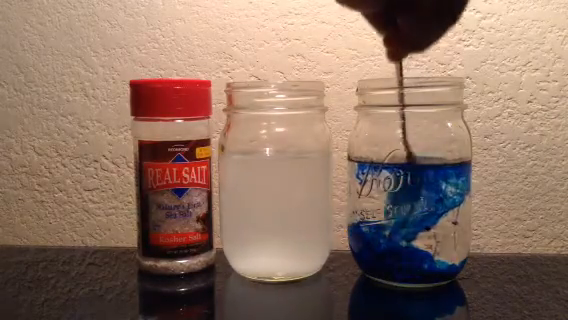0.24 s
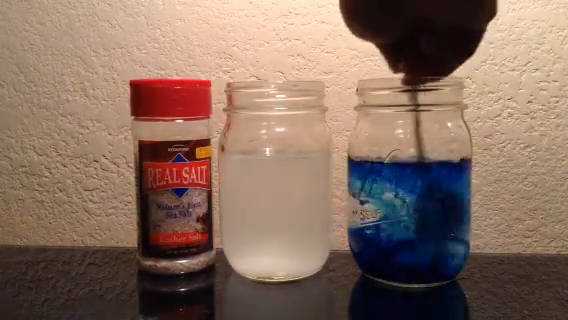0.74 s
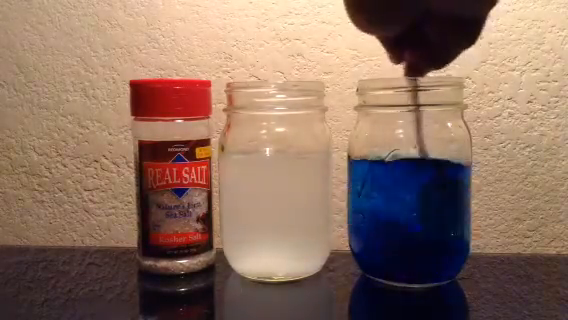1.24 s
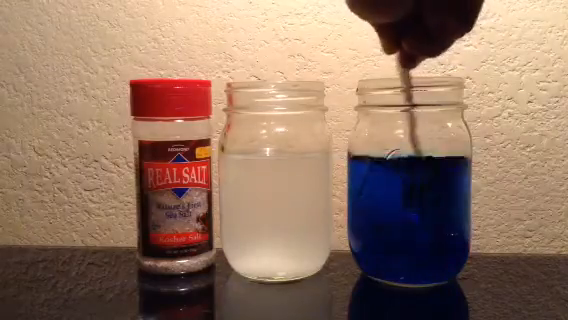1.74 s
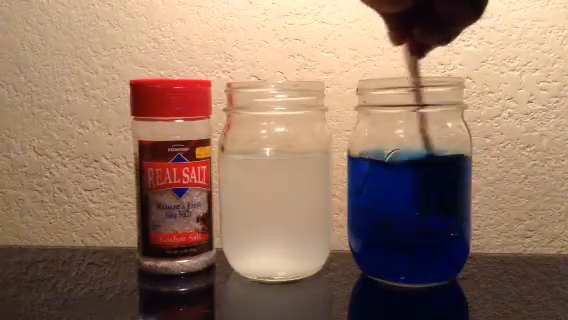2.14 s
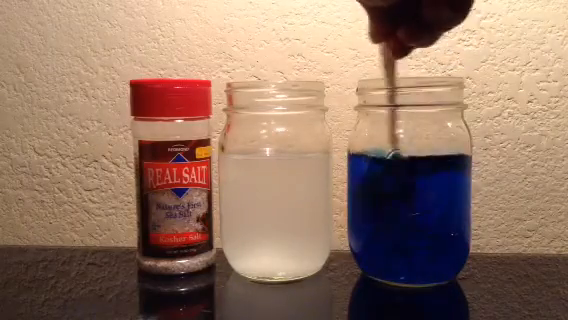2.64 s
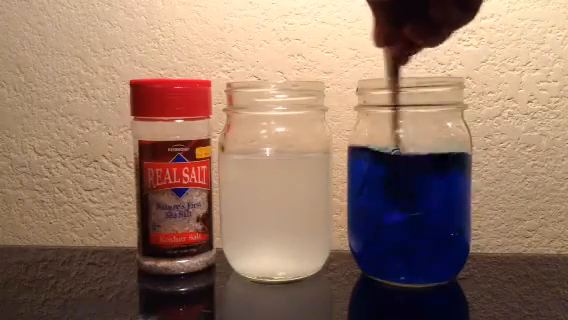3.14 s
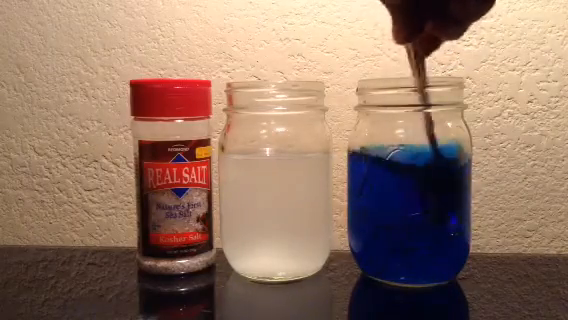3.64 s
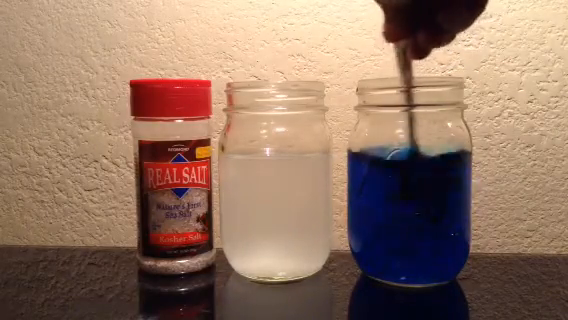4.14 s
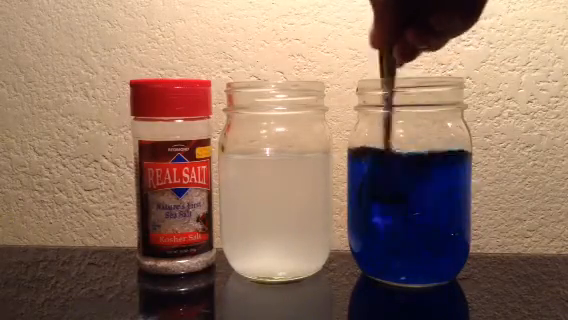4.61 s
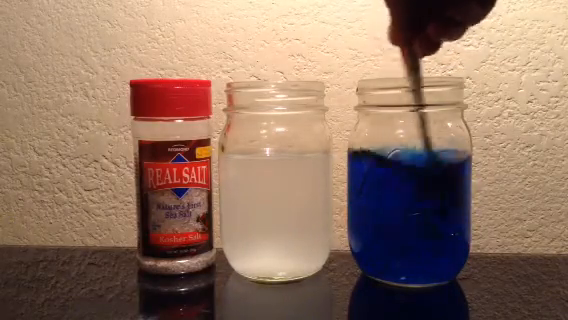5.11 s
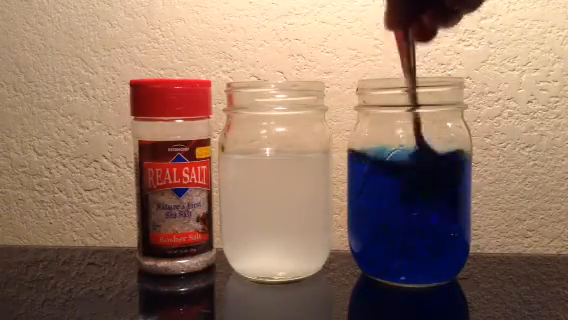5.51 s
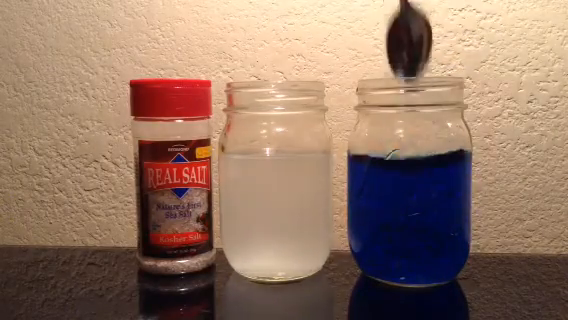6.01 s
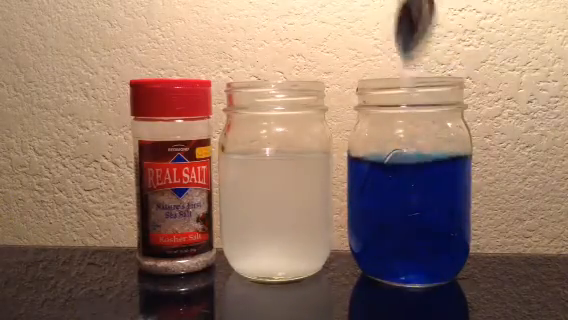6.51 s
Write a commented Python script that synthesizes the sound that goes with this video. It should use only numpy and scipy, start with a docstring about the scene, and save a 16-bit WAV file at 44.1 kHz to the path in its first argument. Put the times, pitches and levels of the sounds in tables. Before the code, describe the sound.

A quiet small room with faint microphone hiss and a low wavering murmur, heard about an arm's length from a glass jar of water. Soft slaps of water come at 0.2 and 0.5 s. A bright spoon clink rings at 0.8 s, a watery splash follows at 0.9, and a softer, rounder clink at 1.3. Around 1.7 to 1.9 s the water sloshes more clearly, with short rising bubble blips and a tiny tick; another dull slosh comes at 2.5. Light touches at 3.0 lead to a clear, singing clink at 3.3. After a slosh near 4.07, the hardest, sharpest hit lands at 4.15, its ring unsteady as the spoon leans on the glass. A final bright clink at 4.44 decays within half a second. Faint slaps at 4.8 and 5.2, weak bubbles at 5.6 and 6.4, and a barely audible low hum from 6 s finish it.

```python
"""A steel spoon stirs water in a glass jar on a table, an arm's length away in a quiet room.
From the start there is microphone hiss and a low, wavering room murmur, both shaped noise; soon water slaps
softly, as resonant noise broken into drops. Then clinks ring the jar's decaying modes, and the sloshing water
makes the wall's ring waver in pitch and level. Bubbles sound among the slaps as short rising tones.
Near the end a faint hum, one low sine, sets in."""
import sys
import numpy as np
from scipy import signal
from scipy.fft import rfft, irfft
from scipy.io import wavfile
from scipy.ndimage import uniform_filter1d

SR = 44100
rng = np.random.default_rng(int(sys.argv[2]) if len(sys.argv) > 2 else 0)


def wrap_up_sound(samples):
    """Save the sound to the file named by the first command line argument, as 16-bit audio."""
    columns = np.atleast_2d(samples).T
    # keep every value between -1 and 1, then stretch to whole-number steps
    tamed = np.clip(columns, -1, 1)
    steps = np.round(tamed * 32767).astype(np.int16)
    wavfile.write(sys.argv[1], SR, steps)


N = 298116


def undb(db):
    """Level law: 20 dB is a factor of ten in amplitude."""
    return 10 ** (np.asarray(db) / 20)


def fade(t, t60, rise):
    """Exponential decay: 60 dB down in t60 s, after a quick rise with time constant rise s."""
    return (1 - np.exp(-t / rise)) * np.exp(-np.log(1000) * t / t60)


def band(x, hz, width):
    """Simple resonance: two poles, gain 1 at the centre."""
    return signal.lfilter(*signal.iirpeak(hz, hz / width, fs=SR), x)


def hiss(size, resonances):
    """Filtered noise of rms 1: each (f/Hz, width/Hz, level/dB) resonance is passed twice for steep sides."""
    x = 0
    for hz, width, db in resonances:
        noise = band(band(rng.standard_normal(size), hz, width), hz, width)
        x = x + undb(db) * noise / np.sqrt(width)
    return x / np.std(x)


def add(out, s, x):
    """Superposition: mix x in from time s."""
    i = int(s * SR)
    out[i:i + len(x)] += x[:len(out) - i]


def wander(size, hold, smooth):
    """Slow random process: values held for hold samples, then a running mean over smooth samples."""
    steps = np.repeat(rng.standard_normal(size // hold + 1), hold)[:size]
    return uniform_filter1d(steps, size=smooth)


# relative spectrum of the background: (f/Hz, spectral level/dB)
BACKGROUND_SPECTRUM = [(15, -69), (25, -36.5), (64, -14), (97, -12), (212, -1), (427, -5.5), (463, -4),
                       (545, -8), (591, -4), (641, -8.5), (1070, -9.5), (1400, -13), (15250, -15.5),
                       (15700, -39)]
BACKGROUND_DB = -69  # rms


def quiet():
    """Stationary noise with a shaped spectrum; its part below about 500 Hz wavers in level as a murmur."""
    hz, db = np.transpose(BACKGROUND_SPECTRUM)
    f = np.maximum(np.arange(N // 2 + 1) * SR / N, 1)
    gain = undb(np.interp(np.log(f), np.log(hz), db))
    x = irfft(rfft(rng.standard_normal(N)) * gain, N)
    swell_db = 1.1 * wander(N, 8000, 8000)
    murmur = signal.sosfilt(signal.butter(2, 500, fs=SR, output="sos"), x)
    x = x + murmur * (undb(swell_db) - 1)
    return x * undb(BACKGROUND_DB) / np.std(x)


# water slaps: (t/s, body level/dB, body f/Hz, splash level/dB, t60/s)
SLAPS = [(0.155, -60, 262, -62, 0.2), (0.488, -65, 223, -83, 0.17), (0.935, -61, 1000, -61, 0.24),
         (1.702, -52.5, 410, -58.5, 0.18), (2.491, -54.5, 292, -63, 0.22), (3.368, -59.5, 604, -59, 0.11),
         (4.067, -52, 404, -59, 0.23), (4.761, -72.5, 205, -67, 0.15), (4.85, -69, 222.3, -82.5, 0.16),
         (5.219, -69.5, 339, -86, 0.15), (6.364, -71, 218, -86.5, 0.15)]
# resonances of the dull body and of the thin splash: (f/Hz, width/Hz, level/dB)
BODY_RESONANCES = [(410, 180, -1.5), (810, 300, -4), (1300, 600, -6.5)]
SPLASH_RESONANCES = [(3232, 330, -5), (3726, 1000, 2), (5000, 3000, -2.5), (10000, 8000, -3.5)]


def water():
    """Amplitude-modulated noise: slaps on the wall, a dull body and a thin splash, broken into small drops."""
    t, out = np.arange(SR // 3) / SR, np.zeros(N)
    for s0, body_db, body_hz, splash_db, t60 in SLAPS:
        drops = undb(2.5 * wander(len(t), 200, 100))
        body = undb(body_db) * hiss(len(t), [(body_hz, .25 * body_hz, 0)] + BODY_RESONANCES)
        splash = undb(splash_db) * hiss(len(t), SPLASH_RESONANCES)
        add(out, s0, drops * (body + splash) * fade(t, t60, .001))
    return out


def ring(hz, t, t60, phase=0):
    """Damped oscillation: one struck mode, whose pitch may move."""
    return fade(t, t60, 0.00067) * np.sin(2 * np.pi * np.cumsum(hz + 0 * t) / SR + phase)


def wet(hz, t, t60, pace, turn):
    """Varying mass loading by moving water: a mode's pitch drifts and its level flutters, at separate paces."""
    drift = 1 + 0.0023 * np.sin(2 * np.pi * ((4 + 8 * pace) * t + turn))
    flutter_db = 4.3 * np.sin(2 * np.pi * ((15 + 30 * turn) * t + pace))
    return undb(flutter_db) * ring(hz * drift, t, t60)


# at the hardest blow the spoon leans on the wall: (t/s, change of lower oval level/dB, of upper oval level/dB)
LEANING = [(4.142, 10.5, 6), (4.172, -16, -14.5), (4.192, 4, -10.5), (4.225, -8.5, 9), (4.259, -14, 7.5),
           (4.328, -12, 3), (4.345, -24, -24), (4.43, -21.5, -9)]
SLOSH_PER_S = 5.9  # the wave round the jar moves the ovals' pitch
SWAY_DB, SWAY_LAG = 1.5, 0.11  # level traded between the ovals, and turns by which this follows the pitch


def ovals(s0, oval_hz, gap_hz, depth_hz, slosh, low_db, low_t60, up_db, up_t60):
    """Split mode pair: two oval wall modes whose pitch and level vary with the wave round the jar."""
    t = np.arange(SR * 2 // 3) / SR
    low_hz = oval_hz + depth_hz * np.cos(2 * np.pi * (SLOSH_PER_S * t - slosh))
    sway_db = SWAY_DB * np.cos(2 * np.pi * (SLOSH_PER_S * t - slosh - SWAY_LAG))
    lean_s, lean_low_db, lean_up_db = np.transpose(LEANING)
    if lean_s[0] - .01 < s0 < lean_s[-1]:
        low_db = low_db + uniform_filter1d(np.interp(s0 + t, lean_s, lean_low_db), size=300)
        up_db = up_db + uniform_filter1d(np.interp(s0 + t, lean_s, lean_up_db), size=300)
    lower = undb(low_db + sway_db) * ring(low_hz, t, low_t60)
    upper = undb(up_db - sway_db) * ring(low_hz + gap_hz, t, up_t60)
    return lower + upper


def bowl(t, hz, hz2, lasting, draw):
    """Modal pair: the spoon's bowl rings in two close modes, the second weaker and longer."""
    first = wet(hz, t, .12 * lasting, *draw[0, -1, :2])
    second = wet(hz2, t, 0.19 * lasting, *draw[1, -1, :2])
    return first + 0.57 * second


def crack(t):
    """Impact noise: a very short broadband burst."""
    return hiss(len(t), [(4010, 11000, 0)]) * fade(t, 0.014, 0.00024)


# modes too dense to part, one list under the treble and one under the top: (f/Hz, width/Hz, level/dB)
SIZZLE = [
    [(7450, 610, 0.5), (8800, 1000, 1)],
    [(10800, 870, -2.5), (13000, 1400, -0.5), (14900, 600, -2)],
]
SIZZLE_DB, SIZZLE_T60_S = -4.5, .14  # level relative to its group; decay at ring time factor 1


def sizzle(t, treble_db, top_db, lasting):
    """High modal density: modes that overlap blur into decaying noise."""
    x = 0
    for db, blur in zip((treble_db, top_db), SIZZLE):
        decay = fade(t, SIZZLE_T60_S * lasting ** .5, .0007)
        x = x + undb(db + SIZZLE_DB) * hiss(len(t), blur) * decay
    return x


# modes of table, jar air, jar wall and spoon, in families that answer together: (f/Hz, ...)
FAMILY_HZ = [(195, 245, 300, 385), (720, 790), (940, 1030), (1250, 1370, 1580), (2235, 2895, 2975),
             (3860, 4092, 4185, 4430), (5225, 5280), (6720, 6820, 7090, 7355, 7592, 7790, 7950),
             (8430, 8540, 8655, 8870, 9222, 9530), (9880, 10180, 10590, 10935),
             (11680, 12070, 12650, 12920, 13270, 13880, 14320, 14800, 15050)]
# per family: (main mode t60/s, other modes t60/s, others' level/dB,
#              crowd of weak modes: one end f/Hz, other end f/Hz, level/dB, t60/s)
# the ring time factor scales every t60 but the main mode's; chance lowers the levels
FAMILY_SHAPE = [(0.097, 0.2, -3.5, 180, 510, -10.5, 0.15), (0.057, 0.029, 4, 550, 950, -9.5, .1),
                (.13, 0.22, -13, 820, 850, -19, 0.15), (.07, 0.063, -4.5, 1150, 2200, -10, .07),
                (.09, 0.14, -7, 2900, 2700, -11.5, .07), (0.11, .12, 1, 3700, 4900, -10, .1),
                (.19, 0.24, -8.5, 4950, 5400, -16, 0.19), (0.08, .13, -5.5, 7400, 8000, -14.5, .1),
                (.11, .13, -4.5, 9000, 7600, -15, 0.11), (.13, 0.33, -11.5, 9800, 11500, -16.5, .1),
                (.08, .12, -6.5, 23000, 20000, -12.5, .1)]
# clink group driving each family: 0 thud, 1 belly, 2 rim, 3 treble, 4 jar air, 5 top, 6 table, 7 shoulder
DRIVEN_BY = [6, 0, 4, 0, 1, 7, 2, 3, 3, 5, 5]
# main mode of each family: f/Hz (None: set by the clink)
MAIN_HZ = [245, 720, 1030, 1370, 2895, 4185, 5225, 7355, None, 10935, 13270]
# each family within its group: level/dB
FAMILY_DB = [-1.83, 2, 1.8, -0.9, -0.06, -2, 0.26, 0.2, -1, -3, -2.5]
# modes whose pitch the water loads: f/Hz
LOADED_HZ = (4185, 5225)
REST_HZ = 2490  # lower oval pitch at which the loaded modes keep their listed pitch


def families(t, group_db, neck_hz, oval_hz, lasting, draw):
    """Modal superposition: every blow starts all modes; loaded ones scale with this clink's lower oval."""
    x = np.zeros(len(t))
    for modes, shape, main_hz, group, own_db, luck in zip(
            FAMILY_HZ, FAMILY_SHAPE, MAIN_HZ, DRIVEN_BY, FAMILY_DB, draw):
        main_t60, other_t60, other_db, end_hz, end2_hz, crowd_db, crowd_t60 = shape
        db = group_db[group] + own_db
        main_hz = main_hz or min(modes, key=lambda hz: abs(hz - neck_hz))
        for hz, (pace, size, turn, *_) in zip(modes, luck):
            if hz == main_hz:
                mode_db, t60 = -3 * size, main_t60
            else:
                mode_db, t60 = other_db - 8 * size, other_t60 * lasting
            load = oval_hz / REST_HZ if hz in LOADED_HZ else 1
            x += undb(db + mode_db) * wet(hz * load, t, t60, pace, turn)
        for *_, place, size, turn in luck:
            hz = end_hz + (end2_hz - end_hz) * place
            weak = ring(hz, t[:SR // 6], crowd_t60 * lasting, 2 * np.pi * turn)
            add(x, 0, undb(db + crowd_db - 5 * size) * weak)
    return x


# clinks: (t/s, crack level/dB, ring time factor, spoon bowl pair f/Hz, f/Hz, bowl level/dB,
#          thud, belly, rim, treble level/dB, lower oval f/Hz, gap to upper oval f/Hz,
#          slosh depth f/Hz, slosh phase/turns, lower oval level/dB, t60/s, upper oval level/dB, t60/s,
#          jar air, top, table, shoulder level/dB, main neck mode f/Hz)
CLINKS = [(0.7982, -27, 0.79, 3653, 3740, -24, -30, -50, -33, -34.5, 2516, 157.8, 5, 0.02, -30.5, .3, -24.5, 0.37, -51, -36.5, -37, -46, 8655),
          (1.3202, -61, 0.58, 3630, 3680, -31.5, -40.5, -32.5, -27, -40, 2507, 165, 6, 0.02, -36.5, .44, -26.5, 0.37, -44.5, -30.5, -43.5, -33.5, 8655),
          (1.8877, -51, .34, 3600, 3750, -70, -82, -74, -62, -55.5, 2500, 159, 6, 0.02, -68, .36, -67.5, 0.32, -64, -64, -77, -66, 8870),
          (2.9881, -48.5, 1.03, 3550, 3650, -54.5, -76, -55.5, -58, -64, 2455, 170, 8, .4, -66.5, .36, -65, .38, -73, -69, -75, -47, 9222),
          (3.0329, -53, 0.56, 3480, 3685, -45, -51.5, -49.5, -62, -66, 2490, 157.6, 24, .4, -51.5, .36, -43.5, 0.42, -60, -75, -54.5, -56, 8430),
          (3.3024, -24, 0.56, 3450, 3730, -30.5, -46.5, -37, -29, -27, 2482, 146, 24, .94, -20.5, .38, -31.5, 0.48, -54.5, -30, -49.5, -36, 9222),
          (3.905, -58, 1.05, 3580, 3710, -67, -79, -72, -75, -73, 2490, 160, 8, 0.02, -72, .36, -70, .38, -81, -62, -78, -79.5, 9530),
          (4.1405, -89.5, .7, 3500, 3710, -62, -77, -56, -72, -63.5, 2422, 58.8, 4, .4, -43, .1, -46.5, 0.32, -68, -66, -92, -57.5, 8655),
          (4.1465, -18.5, 0.8, 3549, 3640, -11, -37.5, -22.5, -28, -23.5, 2425, 54.5, 6, .4, -22.5, .36, -26.5, .38, -37.5, -28, -37, -23, 8870),
          (4.4362, -30.5, 0.47, 3457, 3720, -29, -48, -36, -30, -28.5, 2482, 153, 13, 0.02, -23, .44, -29.5, .42, -56.5, -28, -52, -36.5, 8655)]


def jar():
    """Impact excitation: how the spoon lands sets the level of each group of modes."""
    t, out = np.arange(SR // 4) / SR, np.zeros(N)
    chance = rng.random((len(CLINKS), len(FAMILY_SHAPE), 14, 5))
    for row, draw in zip(CLINKS, chance):
        s0, crack_db, lasting, bowl_hz, bowl2_hz, bowl_db = row[:6]
        group_db, neck_hz = row[6:10] + row[18:22], row[22]
        treble_db, oval_hz, top_db = row[9], row[10], row[19]
        add(out, s0, ovals(s0, *row[10:18]))
        x = undb(bowl_db) * bowl(t, bowl_hz, bowl2_hz, lasting, draw)
        x += undb(crack_db) * crack(t)
        x += sizzle(t, treble_db, top_db, lasting)
        x += families(t, group_db, neck_hz, oval_hz, lasting, draw)
        add(out, s0, x)
    return out


# air pockets trapped by the spoon: (t/s, level/dB, start f/Hz, end f/Hz, t60/s)
BUBBLES = [(1.89, -53.5, 1030, 1075, 0.072), (1.892, -46, 1170, 1420, 0.063),
           (0.938, -62, 1120, 1134, 0.12), (1.707, -55.5, 1015, 1123, 0.11),
           (5.582, -69.5, 1138, 1156, 0.084), (6.362, -66.5, 1082, 1126, .1)]


def bubbles():
    """Bubble resonance: each pocket rings as one tone that rises while it nears the surface."""
    t, out = np.arange(SR // 5) / SR, np.zeros(N)
    for s0, db, hz, end_hz, t60 in BUBBLES:
        rising_hz = end_hz + (hz - end_hz) * np.exp(-t / 0.011)
        add(out, s0, undb(db) * ring(rising_hz, t, t60))
    return out


HUM_FROM_S, HUM_HZ, HUM_DB, HUM_WAVER_DB = 6.04, 160, -76.5, 1.5


def hum():
    """Pure tone with slow amplitude modulation: faint and low, it sets in near the end."""
    t = np.arange(N) / SR
    level_db = HUM_DB + HUM_WAVER_DB * wander(N, 4000, 4000)
    onset = np.clip((t - HUM_FROM_S) / .05, 0, 1)
    return onset * undb(level_db) * np.sin(2 * np.pi * HUM_HZ * t)


ROOM_T60_S, ROOM_DB = 0.23, -17


def room(near):
    """Reverberation: convolution with decaying noise of unit energy."""
    t = np.arange(SR // 2) / SR
    tail = rng.standard_normal(len(t)) * fade(t, ROOM_T60_S, 0.0053)
    return signal.fftconvolve(near, tail / np.sqrt(np.sum(tail ** 2)))[:N]


def scene():
    """Direct plus reverberant sound; the microphone passes little deep bass of the near sounds, hence the
    high-pass."""
    no_bass = signal.butter(2, 185, "highpass", fs=SR, output="sos")
    near = signal.sosfilt(no_bass, jar() + water() + bubbles())
    return (near + undb(ROOM_DB) * room(near) + quiet() + hum())[None]


TOP_HZ = 16200


def record(dry):
    """Band limiting: a steep low-pass cuts the top."""
    return signal.sosfilt(signal.ellip(10, .2, 70, TOP_HZ, fs=SR, output="sos"), dry)


dry = scene()
out = record(dry)
wrap_up_sound(out)
```